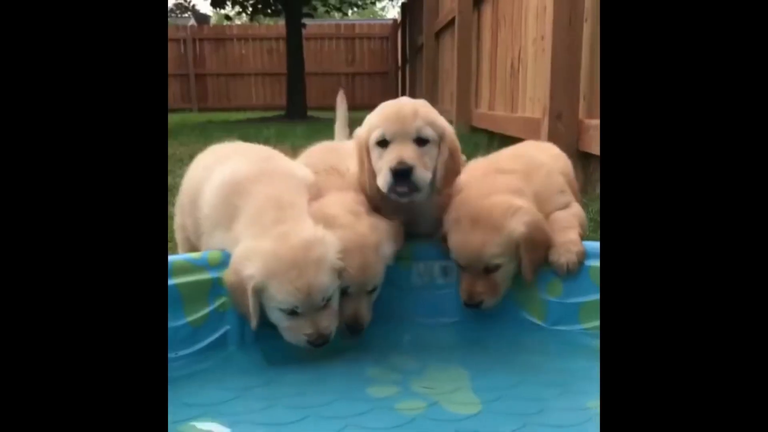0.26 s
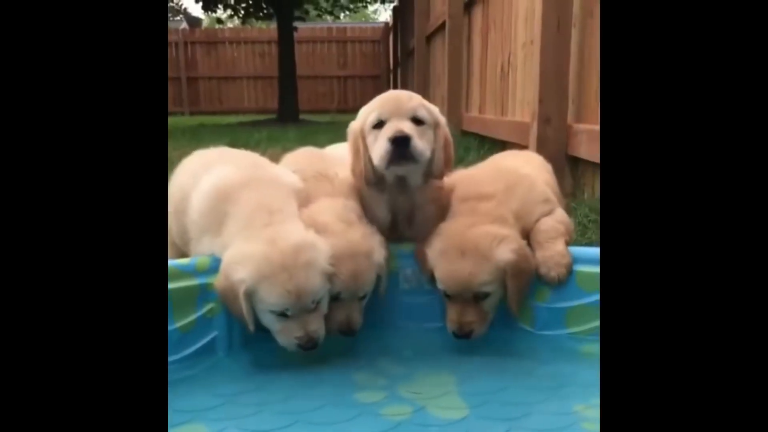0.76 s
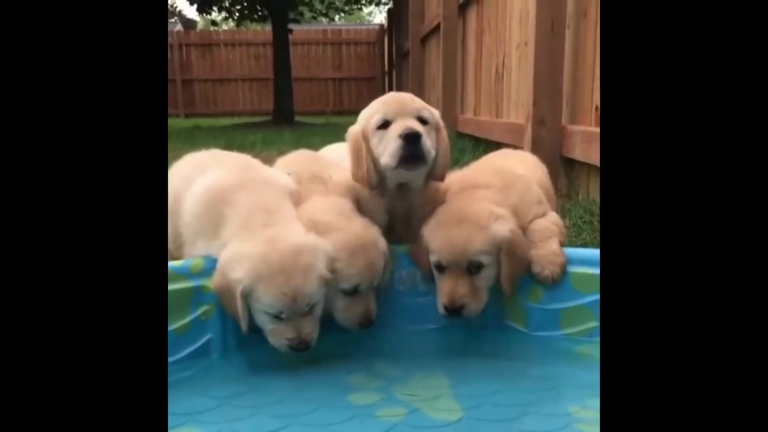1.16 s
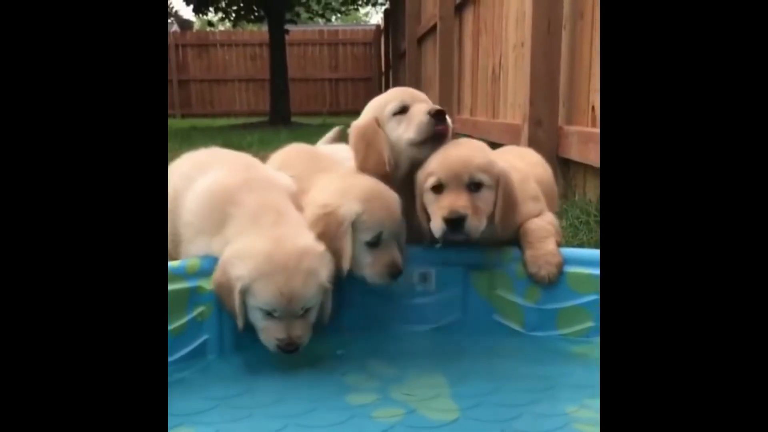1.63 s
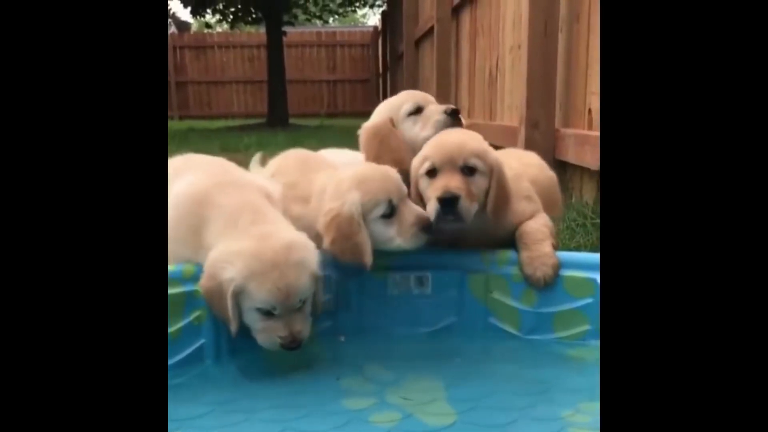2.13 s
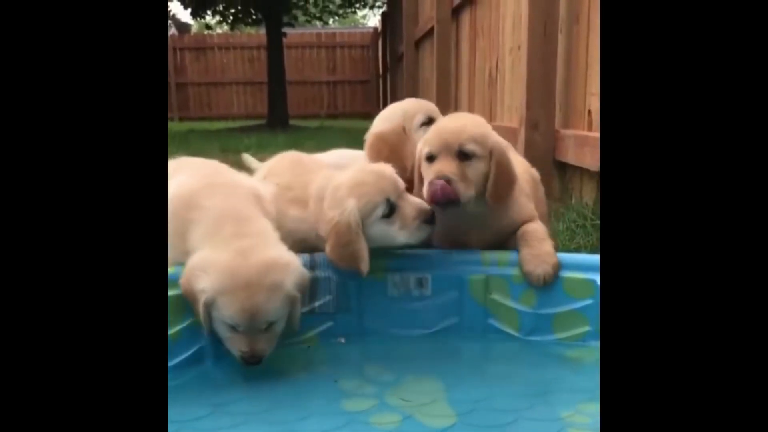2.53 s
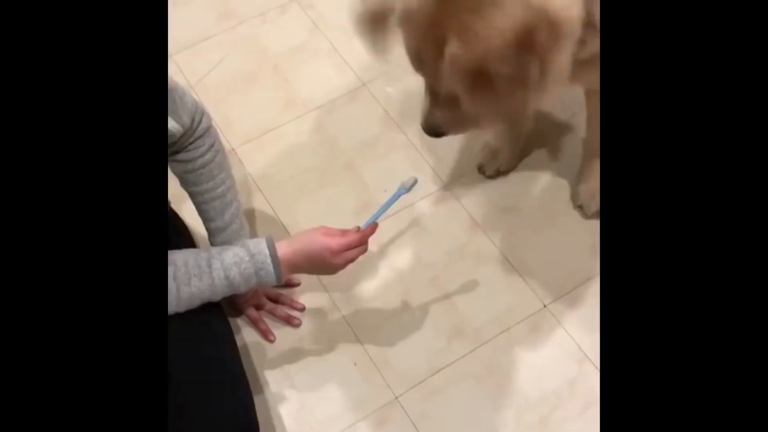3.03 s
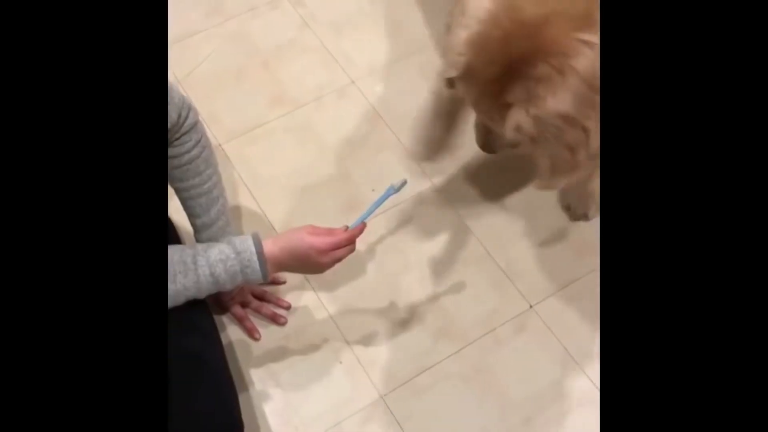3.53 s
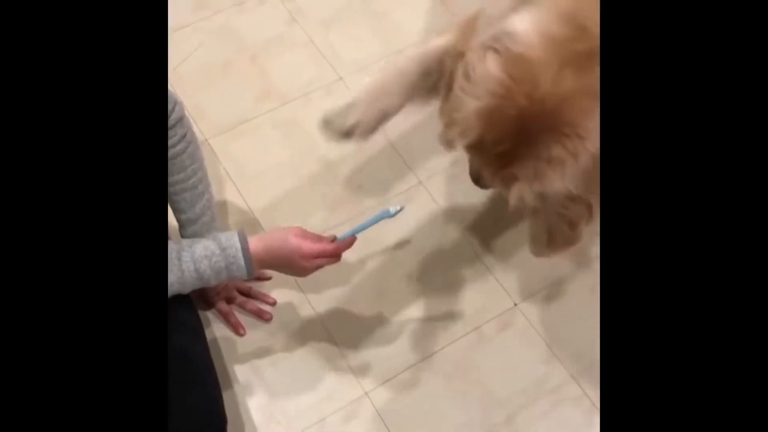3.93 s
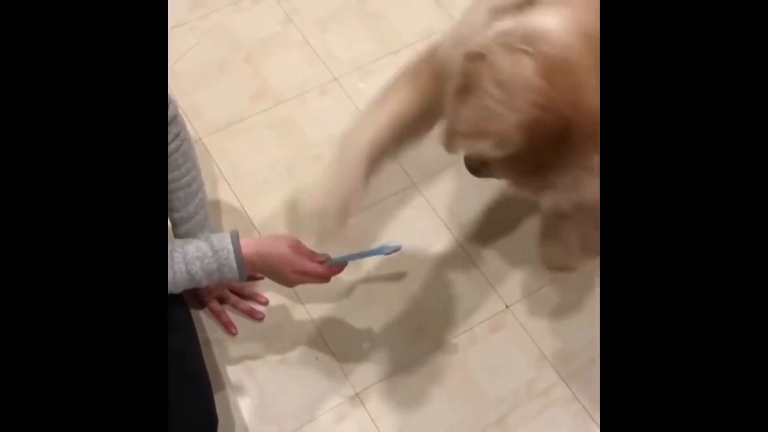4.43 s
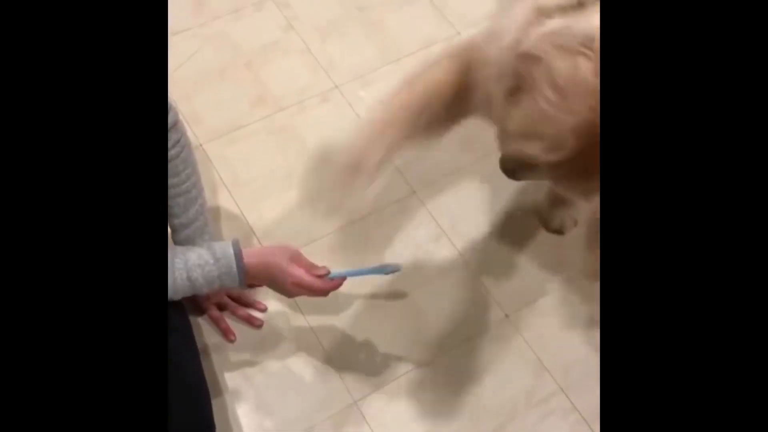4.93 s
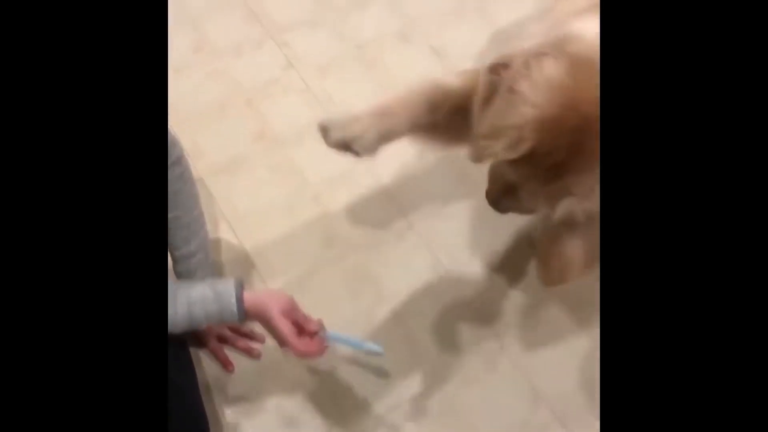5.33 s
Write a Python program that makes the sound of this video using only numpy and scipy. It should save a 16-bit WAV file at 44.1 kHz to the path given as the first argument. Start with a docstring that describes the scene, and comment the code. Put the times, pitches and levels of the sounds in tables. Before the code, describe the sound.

Outdoors, several puppies lap from a plastic wading pool close to a phone microphone: irregular tongue slaps, low plops, bright droplet ticks and swelling watery hiss over a faint machine hum. At about three seconds it cuts hard to a quieter tiled room with a low drone, where a dog's paw swipes softly and claws click on the floor, the sharpest near the end of the stretch.

```python
"""Over a machine's hum and far garden noise, puppies lap at close range from a plastic pool: tongue slaps, low plops,
droplet ticks and whistling glides, with a swelling 4-5 kHz hiss. Water is damped sine bubbles, singly and in swarms.
A hard cut leads to a tiled room with a low drone of noise through resonances. A dog's claws crack as noise bursts and
ring the tile as decaying sines; paw swipes, and the room's dying tails after claw hits, are two bands of grainy noise;
low bumps shake the phone."""
import sys
import numpy as np
from scipy import signal
from scipy.fft import rfft, irfft, next_fast_len
from scipy.io import wavfile
from scipy.ndimage import uniform_filter1d, map_coordinates

SR = 44100
rng = np.random.default_rng(int(sys.argv[2]) if len(sys.argv) > 2 else 0)


def output_pcm(signal):
    """Save a mono or channel-first signal as 16-bit PCM at the path in sys.argv[1].

    Samples are clipped to [-1, 1] before scaling.
    """
    pcm = np.clip(np.atleast_2d(signal).T, -1, 1) * 32767
    wavfile.write(sys.argv[1], SR, np.round(pcm).astype(np.int16))


N = 246430
TIME = np.arange(N) / SR  # s
CUT = 3.0495  # s, the garden ends
GARDEN_SHARE = np.sqrt(CUT * SR / N)  # turns rms 1 over the whole length into rms 1 over the garden
SNAP_DB, SNAP_CYCLES = -7, 1.14  # the sharp smack where tongue or drop meets water


def amp(db):
    """Amplitude of a level in dB."""
    return 10 ** (np.asarray(db) / 20)


def unit(x):
    """x scaled to rms 1."""
    return x / np.sqrt(np.mean(x ** 2) + 1e-20)


def curves(rows):
    """One value per sample for each column after the time."""
    s, *columns = np.transpose(rows)
    return [np.interp(TIME, s, column) for column in columns]


def wobble(rate):
    """A smooth random curve, rate knots a second."""
    knots = rng.standard_normal(int(N * rate / SR) + 4)
    return map_coordinates(knots, [TIME * rate])


def filtered(x, response):
    """x times a response of frequency in Hz."""
    m = next_fast_len(len(x) + 8192)
    return irfft(rfft(x, m) * response(np.fft.rfftfreq(m, 1 / SR)), m)[:len(x)]


def resonance(x, hz, width):
    """x through one resonance applied twice, rms 1."""
    return unit(filtered(x, lambda f: (f * width / (hz * hz - f * f + 1j * f * width + 1e-9)) ** 2))


def shaped(gain_db):
    """Noise whose short-time spectrum follows gain_db(Hz, s)."""
    hz, s, z = signal.stft(rng.standard_normal(N), SR, nperseg=512)
    return signal.istft(z * amp(gain_db(hz[:, None], s)), SR, nperseg=512)[1][:N]


def rush(spectrum, patchy_db):
    """Noise of rms 1 with this spectrum and patches of random gain."""
    def patches(hz, s):
        grid = rng.standard_normal((len(hz), len(s)))
        smooth = uniform_filter1d(uniform_filter1d(grid, size=6, axis=0), size=6, axis=1)
        return patchy_db * unit(smooth)

    f, level = np.transpose(spectrum)
    return unit(filtered(shaped(patches), lambda hz: amp(np.interp(np.log(hz + 1), np.log(f + 1), level))))


def bubbles(s, hz, cycles, size, rise):
    """Damped sines with a soft start; the pitch climbs by the share rise over one life."""
    life = (cycles / hz)[:, None]
    t = np.arange(min(round(2.5 * life.max() * SR), SR // 25)) / SR
    u = t / life
    tone = np.sin(2 * np.pi * hz[:, None] * t * (1 + rise * np.minimum(u, 2) / 2))
    envelope = np.e * 3 * u * np.exp(-3 * u)  # peaks at 1 after a third of a life
    at = (np.round(s * SR)[:, None] + np.arange(len(t))).astype(int)
    return np.bincount(at.clip(0, N).ravel(), (size[:, None] * tone * envelope).ravel(), N + 1)[:N]


def clusters(s, db, hz, length, spread, cycles, count):
    """Each event is a swarm of bubbles around its pitch; it builds up, peaks near s and dies over its length."""
    chance = rng.random((len(s), count, 4))
    lag = chance[..., 0] + chance[..., 3] - .7
    when = s[:, None] + np.reshape(length, (-1, 1)) * lag
    pitch = np.clip(hz[:, None] * np.exp(spread * (2 * chance[..., 1] - 1)), 100, 15000)
    size = amp(db[:, None] - 12.5 * chance[..., 2] - 5.5 * abs(lag))
    return bubbles(when.ravel(), pitch.ravel(), np.full(when.size, cycles), size.ravel(), rise=0.097)


def machine():
    """A machine hums as one slightly unsteady sine, with narrow noise an octave below."""
    # steady tone: f/Hz, level/dB rms before a slight wobble
    hum_tone = (109.3, -54)
    # narrow noise: f/Hz, width/Hz, level/dB rms
    low_band = (54.8, 10, -62.5)
    hz, db = hum_tone
    phase = 2 * np.pi * np.cumsum(hz + 1.27 * wobble(6.15)) / SR
    hum = np.sqrt(2) * amp(db + 0.34 * wobble(10.94)) * np.sin(phase)
    hz, width, db = low_band
    return hum + amp(db) * resonance(rng.standard_normal(N), hz, width)


def far_noise():
    """The distant garden is patchy noise, heaviest in the bass."""
    # spectrum of the distance: f/Hz, relative level/dB
    far_spectrum = [(12, -52), (20, -20.5), (112, -2), (204, -14.5), (754, -26), (1170, -17), (3120, -27),
                    (4450, -21.5), (7680, -32.5), (11600, -39), (13600, -41)]
    return amp(-55.5) * rush(far_spectrum, patchy_db=3.5)


def slosh():
    """Stirred water: many small bubbles in clumps, and a fine fizz above."""
    # swell of the water: t/s, stirred water level/dB rms, fizz level/dB rms before its flicker
    stir_levels = [(0.0, -58.5, -69.5), (0.33, -57, -61.5), (0.6, -58.5, -65.5), (1.4, -55, -65.5),
                   (1.5, -53.5, -61), (1.72, -55.5, -57.5), (1.98, -65.5, -71.5), (2.22, -59.5, -65),
                   (2.45, -68.5, -69.5), (2.6, -59, -57.5), (2.75, -61, -68.5), (3.05, -57.5, -66)]
    # spectrum of the fizz: f/Hz, relative level/dB
    fizz_spectrum = [(3000, -38), (6000, -3.5), (8000, -6), (12000, -7.5)]
    water_db, fizz_db = curves(stir_levels)
    chance = rng.random((2200, 4))
    hz = 320 * (3800 / 320) ** chance[:, 1]
    # a few bubbles stand out; those below 1 kHz are weaker
    size = amp(-3.0 * np.log(chance[:, 2] + .012) + 3.7 * np.log2(np.minimum(hz / 1000, 1)))
    stirred = bubbles(chance[:, 0] * CUT, hz, 2.0 + 6 * chance[:, 3], size, rise=0.19)
    water = GARDEN_SHARE * unit(amp(3.9 * wobble(45)) * stirred)
    flicker_db = 2.5 * wobble(60)
    return amp(water_db) * water + amp(fizz_db + flicker_db) * rush(fizz_spectrum, patchy_db=1)


def hiss():
    """A band of tiny ringing grains over noise; it swells and its centre drifts."""
    # swell of the hiss: t/s, level/dB before crackle and the even mix of noise and grains
    hiss_levels = [(0, -76), (.3, -59), (.54, -66.5), (.68, -55.5), (1.0, -61.5), (1.1, -57.5),
                   (1.3, -69.5), (1.55, -60), (1.61, -52), (1.72, -48.5), (1.83, -65.5), (1.94, -52),
                   (2.05, -51.5), (2.2, -62.5), (2.44, -81), (2.52, -51), (2.6, -46.5), (2.7, -59.5),
                   (2.95, -68.5), (3.03, -57.5)]
    level_db, = curves(hiss_levels)
    centre = 4400 + 120 * wobble(8.5)  # Hz

    def band(hz, s):
        return -9 * ((hz - np.interp(s, TIME, centre)) / 1100) ** 2

    chance = rng.random((800, 4))
    s = chance[:, 0] * CUT
    hz = np.interp(s, TIME, centre) + 1500 * (chance[:, 1] + chance[:, 3] - 1)
    size = amp(-2.8 * np.log(chance[:, 2] + 0.025))
    glide = .2 * rng.random((len(s), 1)) - .13  # most grains fall in pitch, some climb
    grains = bubbles(s, hz, 42 + 0 * s, size, rise=glide)
    crackle_db = 1.3 * wobble(160)
    mix = amp(-2.5) * unit(shaped(band)) + amp(-2.5) * GARDEN_SHARE * unit(grains)
    return amp(level_db + crackle_db) * mix


def tongue_slaps():
    """A slap rings one wavering main bubble among many small neighbours, and throws bright spray."""
    # tongue slaps: t/s, level/dB, f/Hz, spray level/dB over the slap, length/ms
    slap_rows = [(0.059, -39, 1545, -12, 7), (0.114, -48, 1600, -7, 8), (0.134, -41, 868, -13, 10),
                 (0.154, -41, 950, -23, 7), (0.189, -42, 800, -27, 9), (0.19, -39, 1525, -22, 7),
                 (0.264, -44, 1910, -4, 14), (0.298, -47, 1950, -10, 8), (0.3, -45, 1400, -13, 9),
                 (0.445, -41, 990, -6, 6), (0.528, -44, 984, -4, 12), (0.715, -42, 1430, -13, 13),
                 (0.745, -46, 1540, -3, 8), (0.812, -27, 1583, -11, 11), (0.849, -43, 1570, -10, 5),
                 (0.918, -40, 1166, -6, 6), (0.938, -42, 844, -25, 6), (0.957, -33, 1654, -23, 5),
                 (0.964, -41, 1600, -20, 8), (1.078, -48, 1000, -2, 8), (1.098, -39, 1620, -10, 8),
                 (1.123, -39, 860, -20, 12), (1.125, -36, 1420, -11, 12), (1.141, -42, 1600, -10, 8),
                 (1.235, -40, 1510, -14, 6), (1.244, -37, 1764, -9, 7), (1.248, -36, 1114, -17, 10),
                 (1.254, -42, 1656, -14, 6), (1.366, -42, 2570, -26, 6), (1.386, -39, 1895, -18, 6),
                 (1.394, -39, 1850, -14, 7), (1.409, -45, 2200, -4, 11), (1.535, -40, 2060, -20, 8),
                 (1.562, -37, 912, -21, 16), (1.684, -48, 2290, -2, 10), (1.72, -36, 1740, -5, 10),
                 (1.748, -39, 2050, -4, 9), (1.843, -42, 2550, -20, 8), (1.895, -45, 960, -20, 9),
                 (1.901, -39, 2380, -19, 6), (2.068, -45, 1615, -2, 8), (2.218, -48, 1290, 4, 9),
                 (2.24, -43, 2030, -1, 9), (2.293, -41, 2290, -28, 8), (2.446, -43, 1147, -12, 10),
                 (2.567, -47, 1440, -10, 9), (2.583, -36, 1313, -3, 12), (2.74, -46, 1310, -27, 9),
                 (2.8, -48, 1355, -7, 9), (2.927, -33, 1257, -15, 11), (2.944, -40, 820, -11, 10),
                 (2.977, -45, 1130, -23, 9)]
    s, db, hz, spray_db, ms = np.transpose(slap_rows)
    length = ms / 1000
    waver = amp(3 * wobble(300))  # the bubble breaks up as it rings
    main = waver * bubbles(s - .0015, hz, hz * length, amp(db - 2.5), rise=0.05)
    snap = bubbles(s, 1.33 * hz, SNAP_CYCLES, amp(db + SNAP_DB), rise=0.07)
    near = clusters(s, db - 7.5, 1.3 * hz, length, spread=0.65, cycles=4.2, count=32)
    spray = clusters(s, db + spray_db, 0 * s + 4800, length, spread=0.82, cycles=5.1, count=30)
    return main + snap + near + spray


def plops():
    """An air pocket closes with a low climbing note and a few side bubbles; harder plops die sooner."""
    # air pockets closing: t/s, level/dB, f/Hz
    pocket_rows = [(0.128, -49, 427), (0.16, -46.5, 368), (0.19, -49, 516), (0.385, -29.5, 485),
                   (0.422, -46, 620), (0.505, -39.5, 446), (0.992, -43.5, 527), (1.085, -45, 694),
                   (1.207, -37.5, 347), (1.326, -49, 496), (1.488, -38, 337), (1.822, -42, 319),
                   (2.196, -47, 630), (2.752, -47, 670), (2.8, -47, 645), (2.937, -43, 540),
                   (2.958, -39.5, 229)]
    s, db, hz = np.transpose(pocket_rows)
    cycles = np.clip(3.14 - 0.2 * (db + 41), 1.5, 6)  # 3.14 cycles at -41 dB
    pocket = bubbles(s - .001, hz, cycles, amp(db), rise=0.14)
    side = clusters(s, db - 6.5, 1.19 * hz, cycles / hz, spread=0.45, cycles=2.1, count=4)
    return pocket + side


def droplet_ticks():
    """A droplet rings one short high bubble, with a sharp smack and a small swarm."""
    # droplets: t/s, level/dB, f/Hz
    droplet_rows = [(0.2369, -44, 3180), (0.2443, -43, 6700), (0.2713, -44, 5300), (0.4698, -47, 4070),
                    (0.527, -36.5, 4980), (0.664, -43, 6200), (0.6826, -38, 4370), (0.7529, -29, 3080),
                    (0.8001, -43, 6700), (0.8344, -39, 4220), (0.9095, -45, 5900), (0.9165, -38, 9800),
                    (0.917, -37, 12400), (0.9185, -34, 3460), (0.9185, -32.5, 4130), (1.0873, -41, 4740),
                    (1.2296, -46, 5500), (1.244, -36, 3020), (1.2529, -33, 3030), (1.3665, -39, 4300),
                    (1.3856, -31.5, 2860), (1.4105, -40, 6040), (1.412, -42, 4460), (1.475, -36.5, 2750),
                    (1.5214, -45, 9100), (1.5465, -38, 3030), (1.7225, -35, 3390), (1.7469, -35, 5900),
                    (1.7445, -34.5, 2610), (1.8316, -38.5, 4500), (1.945, -42, 9330), (1.9444, -42, 3100),
                    (2.0638, -35, 6370), (2.0645, -35, 4540), (2.065, -37, 7100), (2.066, -39.5, 2480),
                    (2.221, -35, 3970), (2.4465, -33.5, 4170), (2.5789, -35, 4170), (2.582, -35, 5700),
                    (2.9177, -35, 4270), (2.926, -37.5, 4700), (3.0347, -46.5, 3470)]
    tick_s = 0.0042  # life of a droplet's bubble
    s, db, hz = np.transpose(droplet_rows)
    main = bubbles(s - .001, hz, hz * tick_s, amp(db - 3.5), rise=0.039)
    snap = bubbles(s, 1.6 * hz, SNAP_CYCLES, amp(db + SNAP_DB), rise=0.1)
    swarm = clusters(s, db - 9.5, hz, 1.3 * tick_s, spread=0.445, cycles=7.6, count=12)
    return main + snap + swarm


def chirps():
    """Each short whistling glide is one wavering, broken tone."""
    # glides: t/s, level/dB before the waver, start f/Hz, pitch change/share, length/s
    glide_rows = [(1.909, -48, 4640, -.02, 0.019), (1.926, -47, 4140, -.12, 0.015),
                  (1.982, -47.5, 2980, .05, .012), (2.004, -47, 2880, -.03, 0.017),
                  (2.596, -45, 3090, -0.0065, 0.03)]
    s, db, hz, change, length = np.transpose(glide_rows)
    return amp(3.4 * wobble(260)) * bubbles(s, hz, hz * length, amp(db), rise=change[:, None])


def garden():
    """The pool close by, one echo off its wall, and the machine and noise of the garden."""
    wet = tongue_slaps() + plops() + droplet_ticks()
    wall = amp(-18.0) * np.roll(wet, round(.004 * SR))  # the pool wall answers 4 ms later
    return machine() + far_noise() + slosh() + hiss() + wet + wall + chirps()


def drone(noise):
    """An appliance drones: noise in the resonances of the room."""
    # room resonances: f/Hz, width/Hz, level/dB rms
    room_modes = [(59.5, 27, -68), (173.5, 20.7, -58), (239, 40.5, -55), (303.5, 67, -58.5),
                  (588, 18.5, -70), (905, 210, -79.5), (1310, 160, -72.5)]
    return sum(amp(db) * resonance(noise, hz, width) for hz, width, db in room_modes)


def room_air():
    """Steady air in the room is noise, heaviest in the bass."""
    # spectrum of the air: f/Hz, relative level/dB
    air_spectrum = [(12, -58), (20, -24), (65, -10.5), (103, -18.5), (159, -10), (233, -5.5), (574, -22.5),
                    (775, -26.5), (889, -18.5), (1860, -40), (13600, -49.5)]
    return amp(-53.5) * rush(air_spectrum, patchy_db=2.0)


def swipes_and_tails():
    """Paw swipes, and the room's dying tails after claw hits, as grainy noise in a dull and a bright band."""
    # swipes and tails: peak t/s, dull band level/dB, time to rise 20 dB/s (negative: falling), bright over dull/dB
    swell_rows = [(3.09, -65.5, -2.5, -15), (3.57, -62, .07, -14), (3.69, -70.5, 0.07, -2),
                  (3.933, -66.5, 0.1, -23), (4.022, -72.5, 0.08, 5.5), (4.189, -60, 0.04, -9),
                  (4.66, -68.5, 0.27, -7), (4.7, -61, 0.02, 1), (5.115, -65.5, 0.008, -14),
                  (5.16, -65, 0.1, 0.5), (5.205, -53.5, 0.02, 1), (5.285, -59, 0.1, -9),
                  (5.458, -67, .012, -2), (5.546, -47, 0.08, -13)]
    t60 = 0.34  # s, the fall after each peak
    rasp = rng.standard_normal(N) * amp(1.7 * wobble(260))
    dull = unit(filtered(rasp, lambda hz: 1 / np.sqrt(1 + (1300 / (hz + 1)) ** 4) / (1 + (hz / 6000) ** 3)))
    bright = unit(filtered(rasp, lambda hz: 1 / (1 + (6500 / (hz + 1)) ** 6)))
    out = np.zeros(N)
    for s, db, rise, bright_db in swell_rows:
        swell_db = np.where(TIME < s, -20 * (s - TIME) / rise, -60 * (TIME - s) / t60)
        out += amp(db + swell_db) * (dull + amp(bright_db) * bright)
    return out


def tings(noise):
    """Faint thin ringing: narrow noise that starts at once and dies away."""
    # ringing: t/s, f/Hz, level/dB
    ting_rows = [(3.06, 3796, -67), (3.089, 6600, -70), (4.19, 3400, -64), (4.19, 4580, -65),
                 (5.54, 2660, -56)]
    t60 = 0.29  # s
    return sum((TIME > s) * amp(db - 60 * abs(TIME - s) / t60) * resonance(noise, hz, 320)
               for s, hz, db in ting_rows)


def thumps():
    """Low bumps on the phone: sines under a bell-shaped swell."""
    # bumps: t/s, level/dB, f/Hz, length/s
    bump_rows = [(3.696, -53, 32, .1), (3.978, -45, 38, 0.077)]
    return sum(amp(db) * np.exp(-((TIME - s) / length * 2) ** 2) * np.sin(2 * np.pi * hz * TIME)
               for s, db, hz, length in bump_rows)


def claws():
    """A claw touches with a tiny tip, cracks as a dry noise burst and rings the tile's modes briefly."""
    # claw hits: t/s, level/dB before a common 4.5 dB cut, ring level/dB before an 11 dB cut, t60 of the crack/s
    claw_rows = [(4.1828, -43, 1, 0.005), (4.1848, -42.5, 7, 0.015), (4.658, -47.5, -1, .012),
                 (4.6878, -38, -3, 0.0065), (4.689, -36.5, 1.5, 0.011), (5.159, -52, -3, .008),
                 (5.1846, -46, 2, .012), (5.1982, -23.5, -10.5, 0.0067)]
    # tile modes: f/Hz and level/dB before each hit's random shift, t60/s
    tile_modes = [(2700, -9, .012), (3150, 1, 0.02), (3590, 2, 0.02), (4550, 3, 0.018), (5340, 4.5, 0.014),
                  (6500, 4, 0.008), (8660, 1, 0.0069)]
    out = np.zeros(N + SR)
    t = np.arange(SR // 8) / SR
    for s, db, ring_db, crack_t60 in claw_rows:
        ring = 0
        for hz, level, t60 in tile_modes:
            decay = amp(level + rng.uniform(-3, 3) - 60 * t / t60)
            ring = ring + decay * np.sin(2 * np.pi * hz * rng.uniform(.96, 1.04) * t)
        burst = filtered(rng.standard_normal(len(t)), lambda hz: hz / (hz + 2500) / (1 + hz / 9000))
        crack = amp(-60 * t / crack_t60) * unit(burst)
        tip = 1.8 * amp(-60 * t / .001) * np.cos(2 * np.pi * 6000 * t)  # first contact
        out[round(s * SR):][:len(t)] += amp(db - 4.5) * (amp(ring_db - 11.0) * ring + crack + tip)
    return out[:N]


def room():
    """The tiled room: drone and air, the paw's swipes, claws and their tails, ringing and bumps."""
    noise = rng.standard_normal(N)  # one noise excites the drone and the ringing
    return drone(noise) + room_air() + swipes_and_tails() + tings(noise) + thumps() + claws()


def scene():
    """The garden stops dead; after 2.3 ms of silence the room fades in within 1.6 ms."""
    fade_in = np.clip((TIME - CUT - 0.0023) / 0.0016, 0, 1)
    return (garden() * (TIME < CUT) + room() * fade_in)[None]


def record(dry):
    """The phone's microphone keeps nothing above its band limit."""
    top_hz = 13770
    return filtered(dry[0], lambda hz: hz < top_hz)[None]


dry = scene()
out = record(dry)
output_pcm(out)
```